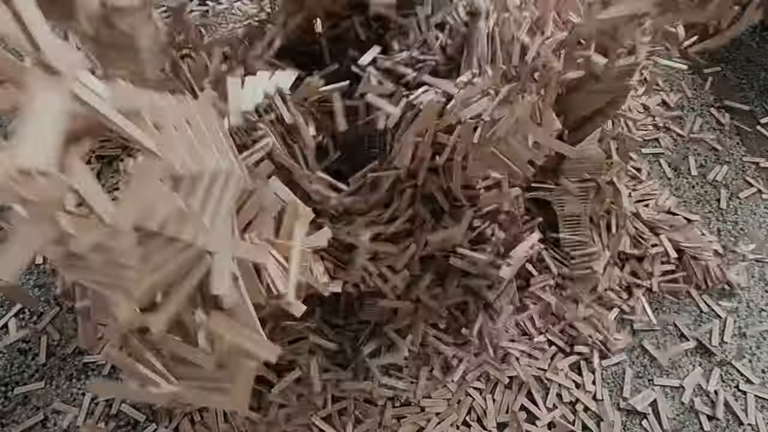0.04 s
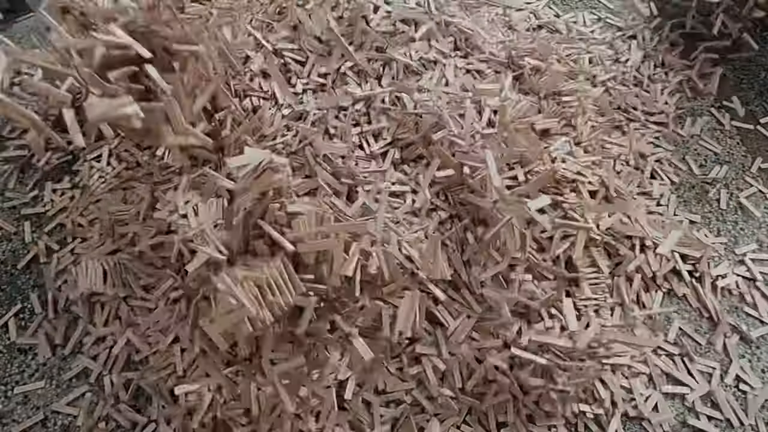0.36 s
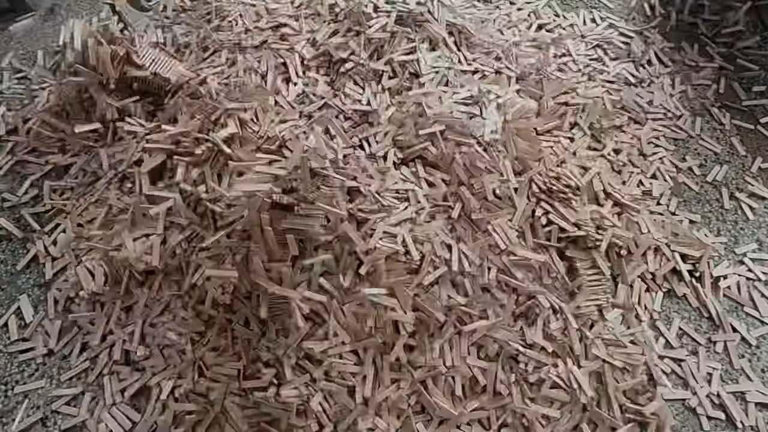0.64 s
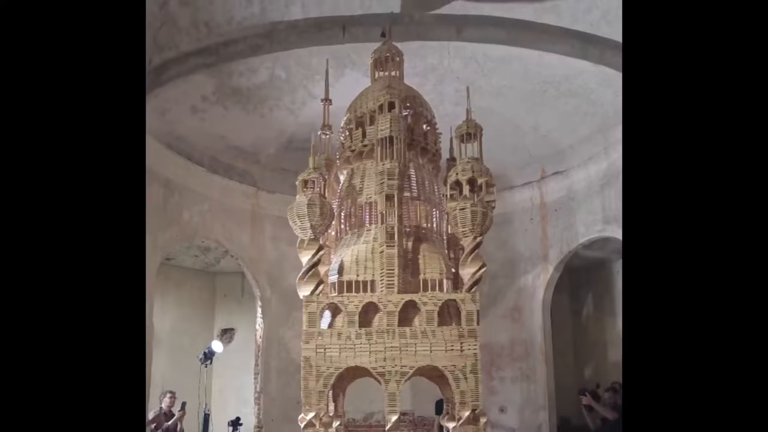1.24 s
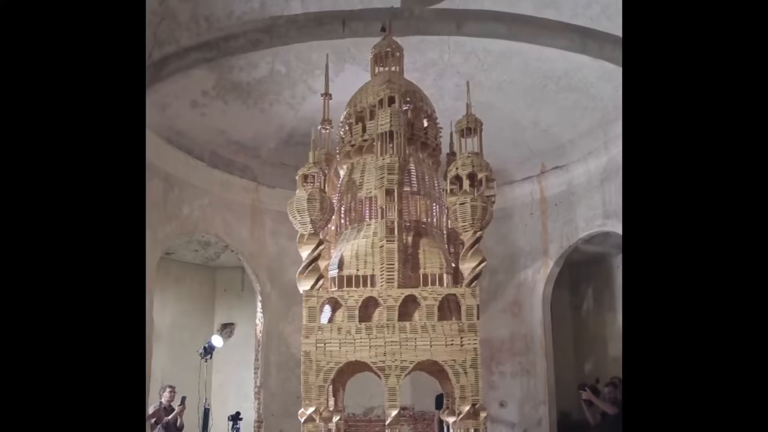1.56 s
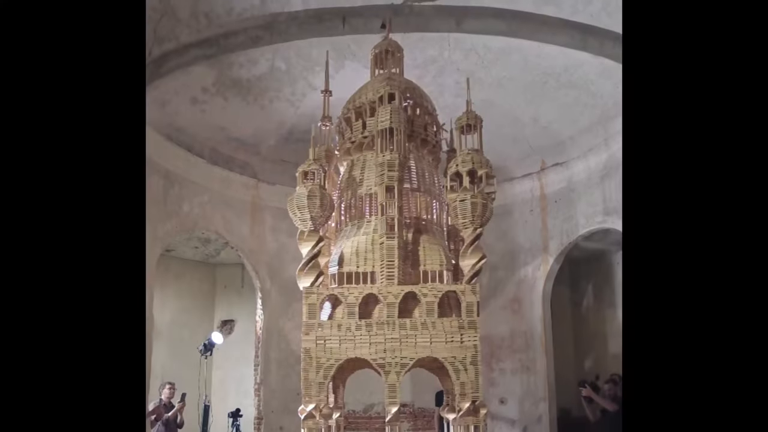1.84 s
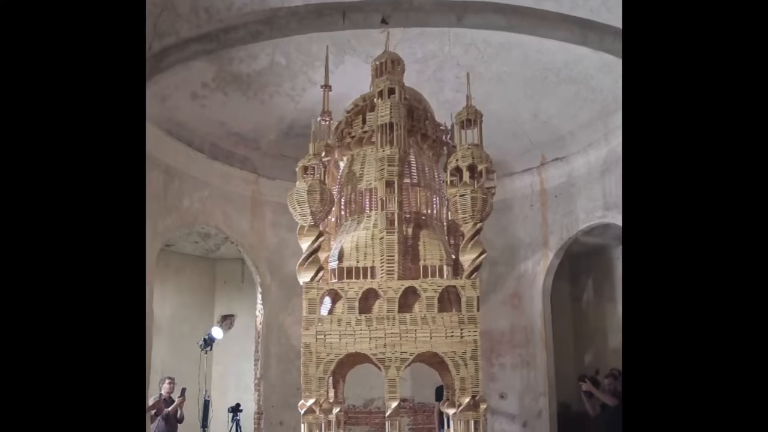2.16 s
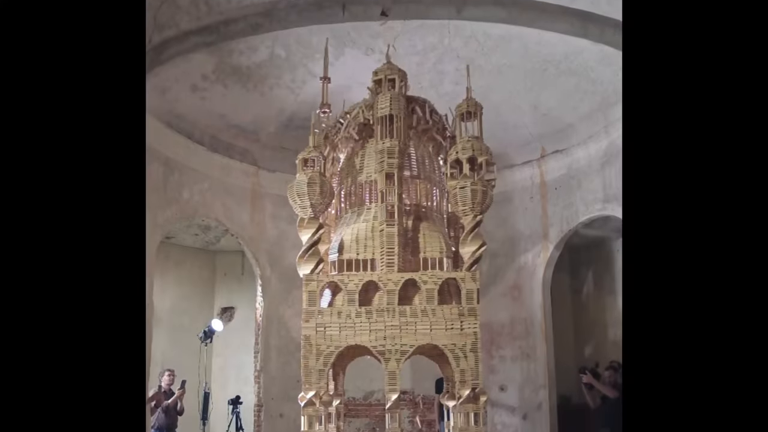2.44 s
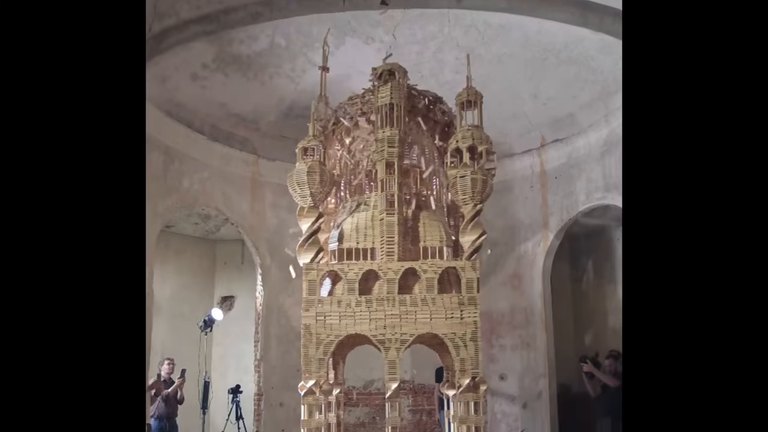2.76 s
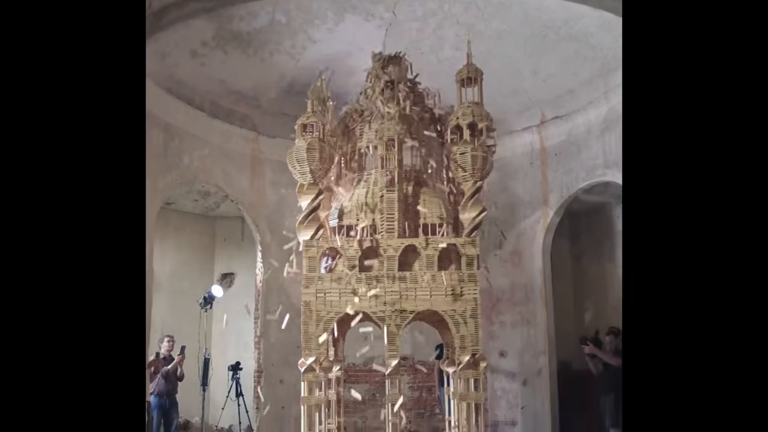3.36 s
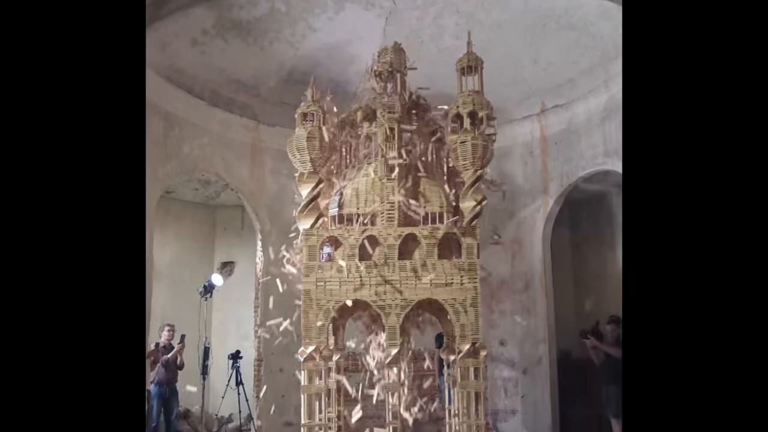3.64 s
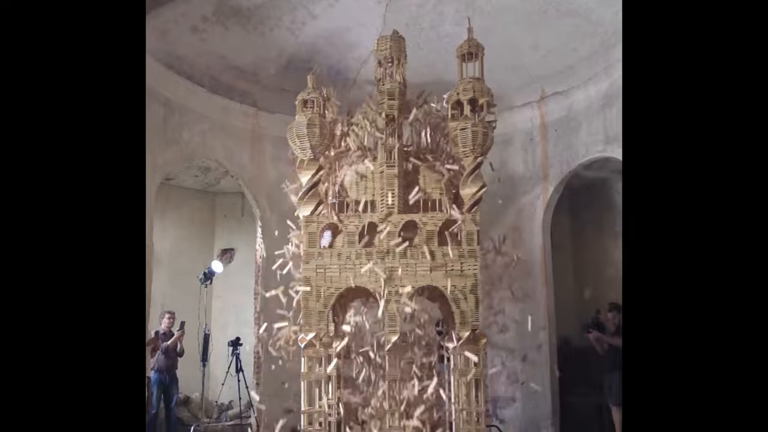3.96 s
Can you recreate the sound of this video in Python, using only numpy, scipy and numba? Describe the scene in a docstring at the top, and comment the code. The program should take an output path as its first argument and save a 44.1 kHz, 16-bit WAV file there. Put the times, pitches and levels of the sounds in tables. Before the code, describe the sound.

Small wooden planks clatter densely onto a heap, close and in mono, over a fading low rumble. At about 1 second the sound cuts to an echoing stone hall in stereo, where a few planks click down. By 1.8 seconds the trickle swells into a rattling roar lasting until 4 seconds, with hollow knocks, dull thuds and a faint deep drone. Planks land sharply nearby around 2.8 and 3.9 seconds.

```python
"""Small wooden planks clatter down as towers of them collapse, in two scenes.
Each plank clicks, rings at its own pitch and bounces. First, close and in mono, planks pour onto
a heap whose rumble dies away. Then the sound jumps to a domed stone hall, in stereo: a few planks
fall and the trickle swells to a roar, with dull thuds, hollow knocks and a faint drone beneath.
Some planks land right beside the two microphones."""
import sys
import numpy as np
from scipy import signal
from scipy.fft import rfft, irfft
from scipy.io import wavfile
from scipy.ndimage import uniform_filter1d
from numba import njit

SR = 44100
rng = np.random.default_rng(int(sys.argv[2]) if len(sys.argv) > 2 else 0)


def digitize_waveform(pressure):
    """Quantize a signal to 16-bit integers and store it at the path in sys.argv[1].

    Rows of a 2-D input are taken as channels; values are limited to [-1, 1].
    """
    field = np.atleast_2d(pressure).T
    bounded = np.clip(field, -1, 1)
    quanta = np.round(bounded * 32767).astype(np.int16)
    wavfile.write(sys.argv[1], SR, quanta)


N = 176400
MIC_LAG_S = .00095  # time sound takes from one microphone to the other

# The tones a plank rings with in the hall (pitch [Hz], level [dB], time to fade by 60 dB [s])
PLANK_TONES = [(1334, -1.5, 0.047), (1714, 0, 0.025), (2250, -5.5, 0.032), (2840, -1.5, 0.036),
               (3362, -5.5, 0.023), (5670, -17.5, 0.011)]
# The click of wood on wood, from bass to treble (frequency [Hz], level [dB])
PLANK_CLICK = [(60, -31), (200, -7.5), (450, 0.5), (750, 2), (1100, 6), (2000, -3.5), (3500, -7),
               (4200, -7), (6500, -14), (10000, -42.5)]
# How the roar swells (time [s], level [dB])
ROAR_LOUDNESS = [(.96, -34), (1.105, -32), (1.12, -28.5), (1.22, -30.5), (1.35, -29), (1.42, -22.5),
                 (1.52, -24), (1.59, -22.5), (1.64, -20.5), (1.75, -18.5), (1.8, -12), (1.93, -11.5),
                 (2.13, -12), (2.42, -13.5), (2.5, -12.5), (2.62, -14), (2.82, -14), (2.92, -12.5),
                 (3.2, -12.5), (3.75, -13.5), (4, -13.5)]
def roar():
    """Plank hits plank so often that the clicks blur into a roar."""
    hits = shower(PLANK_TONES, PLANK_CLICK, count=3600, click_db=-2.5, detune=.062, vary_db=4.5, pan_db=3)
    return unit(echo(hits, echo_db=-3.5)) * undb(-2.5) * fader(ROAR_LOUDNESS)


# The tones of a plank falling on the pile (pitch [Hz], level [dB], fade time [s])
RAIN_TONES = [(1194, -14.5, 0.019), (3120, -5, 0.028), (3470, -4.5, 0.1)]
# How the rain of planks grows (time [s], level [dB])
RAIN_LOUDNESS = [(.96, -57), (1.6, -30.5), (1.85, -25), (2.15, -19), (2.6, -26), (3.05, -22), (3.3, -21),
                 (3.75, -14), (3.86, -20), (4, -15)]
def plank_rain():
    """Planks rain from the top of the tower onto the pile and ring brightly."""
    hits = shower(RAIN_TONES, PLANK_CLICK, count=2400, click_db=-3, detune=.0367, vary_db=3.5)
    return unit(echo(hits, echo_db=-3.5)) * undb(-2.5) * fader(RAIN_LOUDNESS)


# The tones of a plank hitting the floor end first (pitch [Hz], level [dB], fade time [s])
FLOOR_TONES = [(1436, 0.5, 0.024), (1813, -2.5, 0.0076), (3264, -2, 0.014), (5366, -3, .013),
               (6110, -6.5, .01), (7450, -11.5, 0.014)]
# The click of wood on stone (frequency [Hz], level [dB])
FLOOR_CLICK = [(100, -18.5), (700, -6), (1500, 9.5), (3500, 4.5), (4400, 2), (6000, -4.5), (7000, 2.5),
               (9000, -3.5), (10000, -10.5)]
# How the floor clatter comes in bursts (time [s], level [dB])
FLOOR_LOUDNESS = [(.96, -46), (1.03, -47), (1.05, -37.5), (1.35, -45), (1.44, -34.5), (1.55, -36.5),
                  (1.74, -26.5), (1.8, -21.5), (1.93, -19.5), (2, -24.5), (2.14, -21), (2.42, -27),
                  (2.5, -27), (2.66, -30.5), (2.77, -18.5), (2.83, -20.5), (2.9, -26), (3.06, -26.5),
                  (3.12, -19), (3.3, -23), (3.37, -19), (3.47, -19.5), (3.88, -20.5), (3.95, -15), (4, -17)]
def floor_clatter():
    """Planks hit the hard stone floor with sharp clicks, far to the left and right."""
    hits = shower(FLOOR_TONES, FLOOR_CLICK, count=1500, click_db=3, detune=.0533, vary_db=5, pan_db=14)
    return unit(echo(hits, echo_db=.5)) * undb(1.1) * fader(FLOOR_LOUDNESS)


# Single planks landing close by (time [s], relative level [dB], left minus right [dB])
NEAR_LANDINGS = [(1.0393, -26.5, -4), (1.1328, -27, -8), (1.1717, -29, -1), (1.309, -34, 6),
                 (1.3656, -24, -6), (1.4286, -24, -10), (1.4886, -27, 7), (1.5693, -30, 1),
                 (1.5972, -17.5, -9), (1.6279, -29, 9), (2.6937, -11.5, -11), (2.7436, -11, -10),
                 (2.7556, -11, 1), (2.827, -9.5, -8), (2.8576, -16, 1), (3.9376, -12, -8)]
def near_landings(slap_s=.0009, slap_db=-2, slaps=3):
    """A nearby plank hits with one end, then chatters down flat in quick, ever softer slaps."""
    when, db, pan_db = np.array(NEAR_LANDINGS).T
    gains = undb(10 + db + np.array([pan_db, -pan_db]) / 2)
    chance = rng.standard_normal((len(when), len(FLOOR_TONES) + 1))
    gap = slap_s * np.exp(.3 * chance[:, 0])
    pitch_shifts = np.tile(.032 * chance[:, 1:], (slaps, 1))
    times = np.concatenate([when + gap * k ** 1.6 for k in range(slaps)])
    sizes = np.hstack([undb(k * slap_db) * gains for k in range(slaps)])
    hits = strike(np.tile(times, (2, 1)), sizes, pitch_shifts, FLOOR_TONES, FLOOR_CLICK, click_db=3.5)
    return echo(hits, echo_db=-3)


# The tones of a plank on the close heap (pitch [Hz], level [dB], fade time [s])
HEAP_TONES = [(1400, -18.5, 0.014), (2310, -5, 0.039), (2760, -3, 0.033), (3380, -4, 0.017),
              (4270, -16, 0.028), (5550, -7.5, 0.017), (6580, -9, 0.026)]
# Its bright click and its low thud (frequency [Hz], level [dB])
HEAP_CLICK = [(100, -6), (400, -4), (700, -2), (1300, 0.5), (2000, 3.5), (4500, -5), (7000, -8.5),
              (8200, -10), (9800, -19.5), (10900, -21), (12000, -27), (13200, -36), (15000, -38)]
HEAP_THUD = [(20, -4), (45, -3), (80, 0), (150, 1), (250, -0.5), (340, -7), (600, -14.5), (1500, -48.5)]
# How the pouring holds steady while the rumble dies away (time [s], level [dB])
POUR_LOUDNESS = [(0, -16.5), (.15, -18), (.27, -18.5), (.35, -18), (.48, -18.5), (.75, -19.5), (.88, -21.5),
                 (.94, -20.5)]
RUMBLE_LOUDNESS = [(0.0, -19.5), (0.046, -19), (0.334, -24), (0.614, -32), (0.658, -29.5), (0.94, -37.5)]
def heap():
    """Close and in mono: planks pour onto a heap, which rumbles as it settles."""
    hits = shower(HEAP_TONES, HEAP_CLICK, count=8000, detune=.067, vary_db=2.5, pan_db=2.5)
    rumble = shower([], HEAP_THUD, count=2500, vary_db=1.5)[0]
    clatter = unit(echo(hits, echo_db=-8.5)[0])
    return clatter * fader(POUR_LOUDNESS) + rumble * undb(2) * fader(RUMBLE_LOUDNESS)


# How the knocking comes in spurts (time [s], level [dB])
KNOCK_LOUDNESS = [(1.105, -55), (1.115, -23), (1.15, -35), (1.23, -33), (1.28, -30), (1.36, -34),
                  (1.4, -27), (1.45, -26), (1.53, -26), (1.75, -29), (2.05, -18.5), (2.3, -25.5),
                  (2.82, -18), (3.1, -17), (4, -22)]
def knocking():
    """Gentle hits ring only a plank's lowest tone: a hollow knock with hardly any click."""
    hits = shower(PLANK_TONES[:1], PLANK_CLICK, count=700, click_db=-16, detune=.037, vary_db=5, pan_db=7)
    return unit(echo(hits, echo_db=-3)) * undb(-4.5) * fader(KNOCK_LOUDNESS)


# A dull thud in the hall (frequency [Hz], level [dB])
DULL_THUD = [(20, -21), (45, -22), (70, -18), (110, -4.5), (200, -1), (330, 2), (480, 2.5), (800, 4.5),
             (2000, -37.5)]
# How the thuds build up (time [s], level [dB])
THUD_LOUDNESS = [(.96, -40.5), (1.45, -41), (1.52, -37.5), (1.72, -31), (1.82, -31), (2.08, -28.5),
                 (2.35, -39.5), (2.75, -31), (2.95, -33), (3.2, -23.5), (3.55, -24.5), (4, -23.5)]
def thuds():
    """The falling wood lands with low thuds that do not ring."""
    hits = shower([], DULL_THUD, count=1500, vary_db=3.5, pan_db=5)
    return unit(echo(hits, echo_db=0)) * undb(-2.5) * fader(THUD_LOUDNESS)


# The drone is nearly all deep bass (frequency [Hz], level [dB])
DRONE_COLOUR = [(20, -11), (36, -12), (46, 8), (56, -3), (90, -17), (300, -64)]
# How it rises and falls (time [s], level [dB])
DRONE_LOUDNESS = [(1.05, -91), (1.2, -68), (1.95, -64), (2.08, -50), (2.33, -60), (2.45, -54), (3, -51),
                  (3.1, -67), (3.7, -66), (3.9, -49)]
def drone():
    """A faint, deep noise swells and ebbs under the roar."""
    return unit(colour(rng.standard_normal((1, N)), DRONE_COLOUR)) * fader(DRONE_LOUDNESS)


def shower(tones, click, count, vary_db, click_db=0, detune=0, pan_db=0, bounce_s=.04, bounce_db=-2):
    """Planks land at random times and places; each bounces twice, sooner and softer the second time."""
    when, place, height = rng.random((count, 3)).T
    chance = rng.standard_normal((count, len(tones) + 2))
    bounce = np.arange(3)[:, None]  # 0 is the first landing
    delay = bounce_s * (.5 + height) * np.log2(1 + bounce)
    times = ((when * N / SR + delay) % (N / SR)).ravel()
    hit_db = vary_db * np.minimum(chance[:, 1], 2) + bounce_db * bounce
    sizes = (np.sign(chance[:, 0]) * undb(hit_db)).ravel()
    pitch_shifts = detune * np.tile(np.clip(chance[:, 2:], -2, 2), (3, 1))
    # the nearer microphone hears a hit sooner and louder
    nearness = np.tile(place - .5, 3) * np.array([[1], [-1]])
    arrivals = times - MIC_LAG_S * nearness
    gains = sizes * undb(pan_db * nearness)
    return unit(strike(arrivals, gains, pitch_shifts, tones, click, click_db))


def strike(times, gains, pitch_shifts, tones, click, click_db):
    """Each hit makes a click and sets its plank's tones ringing."""
    start = np.clip(times * SR, 0, N - 1).astype(np.int64)
    taps = np.array([np.bincount(s, g, N) for s, g in zip(start, gains)])
    out = undb(click_db) * colour(taps, click)
    for k, (hz, db, fade_s) in enumerate(tones):
        step = 2 * np.pi * hz * np.exp(pitch_shifts[:, k]) / SR
        decay = np.log(1000) / (fade_s * SR)
        out += (-1) ** k * undb(db) * ring(start, gains, step, decay, N)
    return out


@njit
def ring(start, gains, step, decay, length):
    """Struck wood vibrates: one fading sine wave per hit, heard at both microphones."""
    out = np.zeros((2, length))
    for k in range(len(step)):
        turn = np.exp(complex(-decay, step[k]))  # moves the wave on one sample and shrinks it
        wave = complex(2 * np.sqrt(decay), 0)
        for i in range(min(int(5.5 / decay), length - max(start[0, k], start[1, k]))):
            out[0, start[0, k] + i] += gains[0, k] * wave.imag
            out[1, start[1, k] + i] += gains[1, k] * wave.imag
            wave *= turn
    return out


def echo(x, echo_db, bass_fade_s=1.7, treble_fade_s=.97, delay_s=.008):
    """Stone walls add a wash of echo: the treble dies first, the bass is alike at both microphones."""
    t, hz = np.arange(N // 2) / SR, np.fft.rfftfreq(N // 2, 1 / SR)
    mid, side = rfft(rng.standard_normal((2, N // 2)))
    alike = np.sinc(2 * hz * MIC_LAG_S)
    wash = mid * np.sqrt(1 + alike) + side * np.sqrt(1 - alike) * np.array([[1], [-1]])
    bass_share = 1 / (1 + (hz / 3500) ** 2)
    bass = irfft(wash * bass_share) * undb(-60 * t / bass_fade_s)
    treble = irfft(wash * (1 - bass_share)) * undb(-60 * t / treble_fade_s)
    tail = (bass + treble) * (t > delay_s)
    return x + undb(echo_db) * signal.fftconvolve(x[:1], tail / np.linalg.norm(tail[0]), axes=1)[:, :N]


def colour(x, points, size=4096):
    """Shape bass and treble to follow (frequency [Hz], level [dB]) points."""
    hz, db = np.array(points).T
    gain = undb(np.interp(np.log(np.fft.rfftfreq(size, 1 / SR) + 1), np.log(hz), db))
    one_sided = irfft(np.log(gain))[:size // 2]  # so nothing sounds before its hit
    response = irfft(np.exp(2 * rfft(one_sided, size)))
    return signal.oaconvolve(x, response[None] / np.linalg.norm(response), axes=1)[:, :N]


def undb(db):
    """Turn decibels into a volume factor."""
    return 10 ** (np.asarray(db) / 20)


def unit(x):
    """Scale a sound to an average (rms) level of 1."""
    return x / np.sqrt(np.mean(x ** 2))


def fader(curve):
    """A volume that glides through (time [s], level [dB]) points."""
    return undb(np.interp(np.arange(N) / SR, *np.array(curve).T))


def lowpass(x, hz):
    """Cut the treble steeply above hz."""
    return signal.sosfilt(signal.ellip(10, .2, 70, hz, fs=SR, output="sos"), x)


def scene(switch_s=.956):
    """The close heap, then a sudden switch to the hall, with clipped peaks and less treble."""
    lean_right = undb([[-.25], [.25]])
    clatter = (roar() + plank_rain() + floor_clatter()) * lean_right
    hall = clatter + near_landings() + knocking() + thuds() + drone()
    hall = lowpass(np.clip(hall, -.9, .9), hz=10000)
    on_heap = uniform_filter1d(1. * (np.arange(N) / SR < switch_s), size=64)
    return on_heap * heap() + (1 - on_heap) * hall


def record(dry):
    """Remove the very highest treble."""
    return lowpass(dry, hz=14500)


dry = scene()
out = record(dry)
digitize_waveform(out)
```